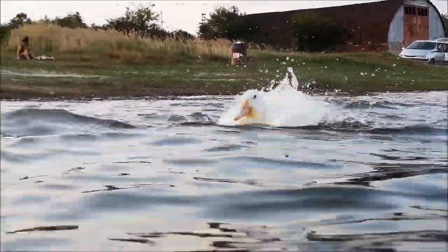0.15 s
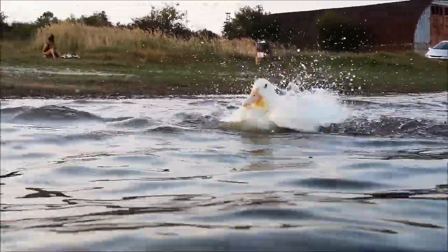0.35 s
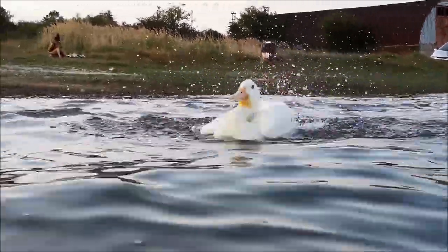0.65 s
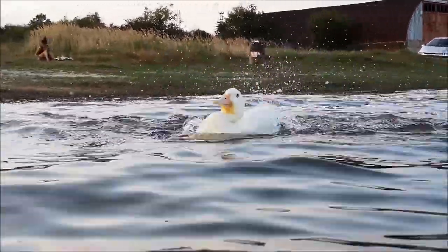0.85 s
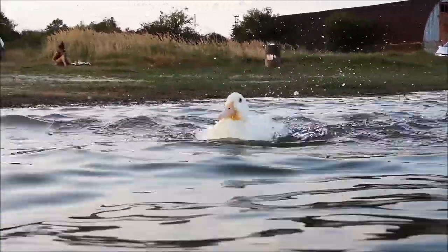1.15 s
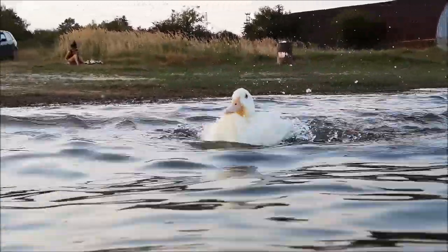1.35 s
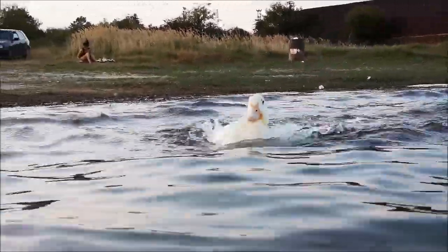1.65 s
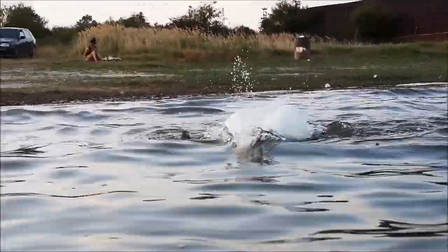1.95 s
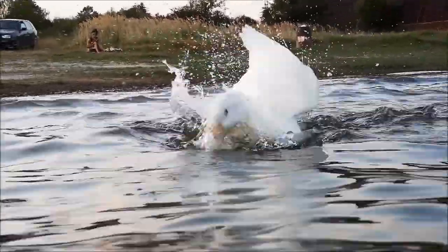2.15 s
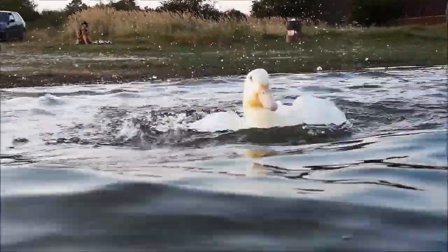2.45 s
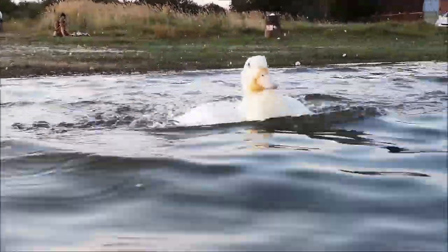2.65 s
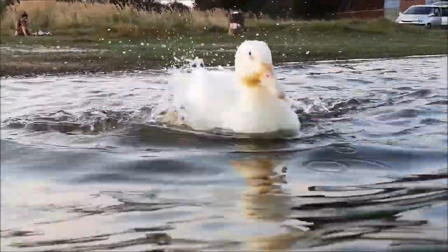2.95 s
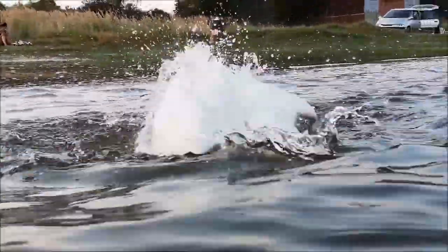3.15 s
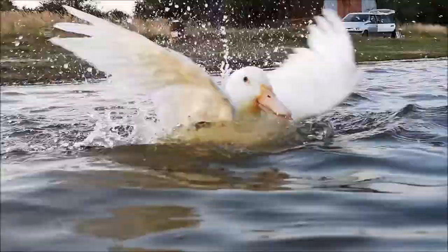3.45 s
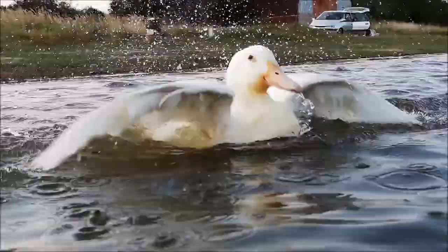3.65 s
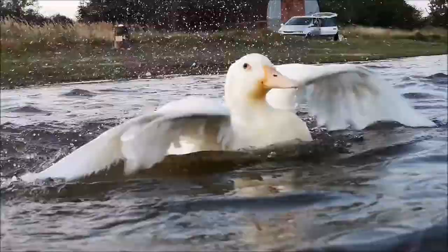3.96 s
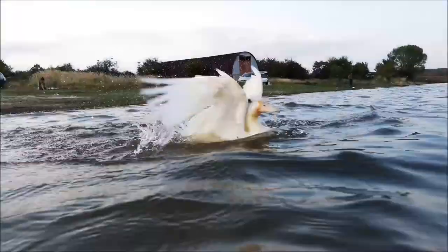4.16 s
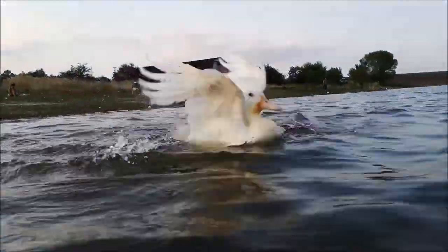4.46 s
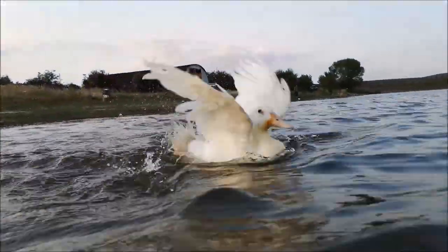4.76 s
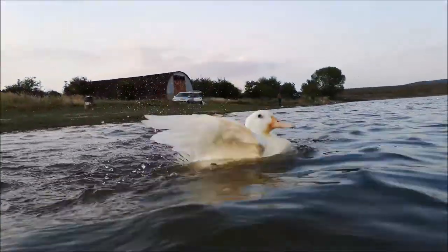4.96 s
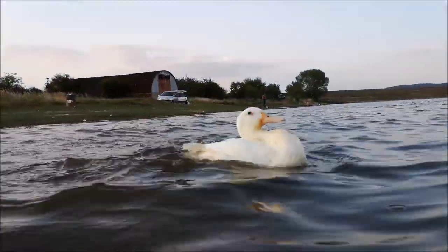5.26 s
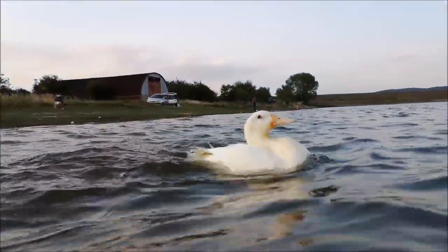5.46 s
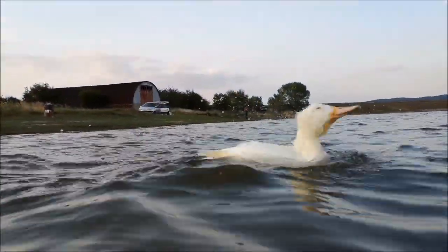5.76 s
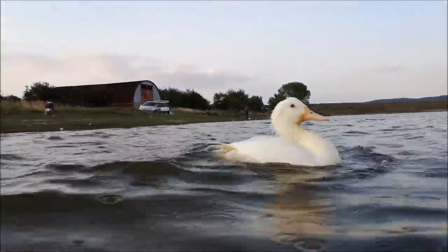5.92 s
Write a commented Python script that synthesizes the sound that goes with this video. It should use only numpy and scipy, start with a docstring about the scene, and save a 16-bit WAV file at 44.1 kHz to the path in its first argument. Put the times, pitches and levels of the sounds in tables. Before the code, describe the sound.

Low gusts thump and flutter on a small microphone throughout, over a faint lake hiss. Ragged splashes with fizzing spray and bubbles come first, then a lull with water running off feathers, a second flurry, and a heavy run of wet wing slaps. After that only tiny drips and soft trickling remain in the wind.

```python
"""A duck thrashes on a windy lake near a small two-port microphone. Its slaps, with small ticks and swells of
splashing, are bursts of noise with ragged tails; churned water is noise mixed with thousands of random droplets.
Low knocks, ringing bubbles and tiny high drop ticks are damped sines that glide up in pitch; water trickles
off the feathers, and a few drips follow once the duck settles. Gusts buffet the ports throughout as low noise,
over a soft hiss from the lake."""
import sys
import numpy as np
from scipy import signal
from scipy.fft import rfft, irfft, next_fast_len
from scipy.io import wavfile
from scipy.ndimage import map_coordinates

SR = 44100
rng = np.random.default_rng(int(sys.argv[2]) if len(sys.argv) > 2 else 0)


def dump_mix(stems):
    """Bounce the given channels to the path in sys.argv[1] as a 16-bit WAV at rate SR."""
    frames = np.atleast_2d(stems).T  # one column per channel
    limited = np.clip(frames, -1, 1)  # hard clip at full scale
    pcm = np.round(limited * 32767).astype(np.int16)
    wavfile.write(sys.argv[1], SR, pcm)


def gain_from_db(level_db):
    """Turn a decibel level (scalar or array-like) into a linear amplitude factor."""
    decades = np.asarray(level_db, float) / 20
    return 10 ** decades


N = 268569  # length in samples

# Gusts on the ports. Each row: time in seconds, rumble level in dB, flutter level in dB.
GUSTS = [(0.0, -24, -41), (0.15, -37, -43), (0.32, -21.5, -34.5), (0.6, -27.5, -50.5), (0.8, -39, -58),
         (0.96, -28.5, -46), (1.17, -21, -30), (1.27, -40, -56), (1.44, -27, -48), (1.76, -46.5, -69),
         (1.83, -27.5, -49), (2.07, -38, -65), (2.17, -21.5, -34), (2.45, -36.5, -46), (2.88, -27, -39),
         (3.02, -35.5, -52.5), (3.14, -31, -38.5), (5.2, -26, -36), (5.33, -34, -45.5),
         (5.55, -21.5, -32.5), (5.74, -33, -44.5), (5.96, -23, -34), (6.09, -34, -49)]
# Churned water, before its brief swells and dips. Each row: time in seconds, body level in dB,
# fine spray level in dB.
CHURN_LEVELS = [(0.0, -42.5, -57), (0.32, -38, -48), (0.6, -43.5, -49), (0.77, -50.5, -54),
                (1.0, -48.5, -59), (1.74, -55, -65), (1.8, -54, -68), (1.9, -44.5, -55), (2.66, -44, -58),
                (3.12, -40, -53.5), (3.5, -42, -51), (3.8, -43, -47), (4.91, -40.5, -45),
                (5.02, -58, -59.5), (5.15, -69.5, -72), (6.09, -68.5, -71)]
# Slaps, small ticks and swells of splashing. Each row: start in seconds, burst level in dB, crack level in dB,
# change of the churn body in dB.
SPLASH_HITS = [(0.0576, -6.5, -13, 4.5), (0.0741, -26.5, -18, 0.5), (0.2192, -15.5, -7.5, 5),
               (0.4331, -12, -10, 2), (0.6057, -18, -12.5, 1.5), (0.9253, -25, -38, 3.5),
               (0.962, -42, -36, 2.5), (1.193, -35.5, -16, -2.5), (1.283, -38.5, -13.5, 2.5),
               (1.319, -42, -24, 6.5), (1.5232, -30, -17.5, -1), (1.648, -35, -25, 5),
               (1.913, -22.5, -48, 0.5), (1.97, -22.5, -14, 0.5), (2.07, -18.5, -18, 3),
               (2.126, -31, -9.5, -3.5), (2.178, -44, -14, -0.5), (2.229, -29, -18.5, 3.5),
               (2.432, -18, -16.5, 8.5), (2.4394, -15.5, -15.5, 0.5), (2.447, -40, -9.5, -7),
               (2.5067, -18.5, -7, 2), (2.597, -23.5, -31, -15), (2.694, -46, -44, 2),
               (2.895, -4.5, -14, 3.5), (3.0238, -18, -9, 4.5), (3.077, -8, -9, 6), (3.201, -17.5, -19, 4),
               (3.2384, -12, -7, 6), (3.3655, 4, 9, 5), (3.5372, -9.5, -1.5, 6), (3.6926, -3.5, -12.5, 8.5),
               (3.854, -14, -5, 6), (3.958, -20, -7.5, 1), (3.9935, -16, 3, 5), (4.1819, -25.5, 0, -2),
               (4.2565, -28, -4, 1), (4.291, -15, -12, 4.5), (4.3235, -20.5, -10.5, -6),
               (4.413, -12, -12.5, 4.5), (4.4293, -3, 6, -1.5), (4.5445, -17.5, -7, 3.5),
               (4.7126, 2.5, 1.5, 3.5), (4.8557, -12.5, 13, -3)]
# Low knocks under some slaps, clear ringing bubbles and tiny high ticks of single drops. Each row: time in
# seconds, level in dB, starting pitch in Hz, t60 in seconds, pitch rise per t60 as a share of the starting pitch.
KNOCKS_AND_BUBBLES = [(0.058, -10, 428, 0.0089, 0.16), (0.218, -3.5, 476, 0.0054, 0.19),
                      (1.84, -38, 550, 0.076, 0.14), (1.915, -18.5, 1090, 0.019, 4),
                      (1.968, -26, 1270, 0.031, 0.18), (2.066, -26, 1194, 0.039, 0.29),
                      (2.108, -25.5, 895, 0.16, 1.87), (2.289, -21, 1260, 0.014, 0.38),
                      (2.93, -25.5, 1610, 0.03, 0.23), (3.025, -24.5, 976, 0.036, 0.21),
                      (3.271, -29.5, 930, 0.09, 0.36), (3.3663, -7, 400, 0.0081, 0.23),
                      (3.592, -25.5, 1170, 0.046, 0.36), (4.095, -15.5, 3370, 0.019, 0.13),
                      (4.195, -34.5, 823, 0.1, 0.65), (4.484, -22, 1068, 0.14, 0.03),
                      (4.485, -20, 1280, 0.034, 0.4), (4.906, -27.5, 1764, 0.058, 0.18),
                      (5.162, -48, 1540, 0.11, 0.09), (5.253, -49.5, 3040, 0.04, 0.1),
                      (5.412, -49, 1950, 0.043, .1), (5.45, -45, 2300, 0.04, 0.23),
                      (5.546, -45, 5500, 0.0086, 0.056), (5.57, -45, 1750, 0.031, 0.18),
                      (5.589, -36.5, 1650, 0.061, 0.64), (5.592, -52, 1154, 0.2, 2.9),
                      (5.659, -38, 7940, 0.008, 0.05), (5.85, -40.5, 1980, 0.039, 0.15),
                      (6.03, -46.5, 1330, 0.034, 0.18)]
# Where the duck is. Each row: time in seconds, lead of the left port in milliseconds.
DUCK_BEARING = [(1.8, 0.016), (2.3, 0.0035), (3.6, 0.11), (4.9, 0.11), (5.5, 0.084)]
# Tone of the splashing as the microphone passes it. Each row: frequency in Hz, level in dB.
SPLASH_TONE = [(330, -11.5), (700, -13.5), (1060, -7.5), (1800, -5), (2750, -4.5), (3600, -7),
               (4500, -12.5), (5900, -8.5), (6600, -15), (9200, -14.5), (11500, -19), (14500, -27.5),
               (16000, -44)]
# Tone of the wind's low rumble. Each row: frequency in Hz, level in dB.
RUMBLE_TONE = [(9, -63), (15, -2.5), (62, -1.5), (110, -5.5), (150, -17.5), (240, -120)]
# Tone of the wind's flutter. Each row: frequency in Hz, level in dB.
FLUTTER_TONE = [(59, -71), (100, -15.5), (146, 1), (355, -27.5), (500, -51), (900, -120)]
# Tone of the far water and shore. Each row: frequency in Hz, level in dB.
LAKE_TONE = [(240, -57.5), (550, -2), (2750, -8), (4000, -45), (11000, -18), (16000, -30)]
# Colour of the two ports. Each row: frequency in Hz, level of left over right in dB.
PORT_TILT = [(700, 0.5), (1800, -1), (2700, -1), (4200, -9.5), (6400, 0), (9500, 5.5), (14000, -11)]
# Likeness of the wind at the two ports. Each row: frequency in Hz, correlation from 0 to 1.
WIND_LIKENESS = [(30, 0.96), (100, 0.95), (350, 0.56)]
# Likeness of the wash at the two ports. Each row: frequency in Hz, correlation from 0 to 1.
WASH_LIKENESS = [(1200, 0.81), (2500, 0.31)]
# Short puffs on the ports. Each row: centre in seconds, half-width in seconds, flutter change in dB,
# rumble change in dB.
PUFF_HITS = [(0.424, 0.021, 14.5, -4), (1.624, 0.029, 5, 11.5), (2.551, 0.019, 13, 13),
             (4.166, 0.075, 7.5, 6), (5.238, 0.024, 6.5, 3.5)]
# Water running off the feathers. Each row: start in seconds, length in seconds, typical drop level in dB,
# typical pitch in Hz.
FEATHER_TRICKLES = [(.8, 0.047, -42.5, 2400), (.92, 0.071, -45, 2080), (1.29, 0.097, -41.5, 2750),
                    (1.53, 0.25, -50.5, 2600), (5.03, 0.46, -61, 3080), (5.69, 0.14, -53.5, 3400)]
# Single pushes of air on both ports. Each row: centre in seconds, level in dB, frequency in Hz.
AIR_PUSHES = [(2.559, -12, 131), (2.637, -11.5, 67), (4.186, -15.5, 140)]


def unit(x):
    """Scales a sound to rms 1."""
    return x / np.sqrt(np.mean(x ** 2) + 1e-20)


def along(points, hz):
    """Reads (Hz, value) points on a log frequency axis."""
    f, v = np.transpose(points)
    return np.interp(np.log(hz + 1), np.log(f + 1), v)


def curves(rows):
    """Gives one value per sample for each column after the time."""
    s, *cols = np.transpose(rows)
    return [np.interp(np.arange(N) / SR, s, c) for c in cols]


def wobble(rate):
    """Draws a smooth random curve with rate knots a second."""
    knots = rng.standard_normal(int(N * rate / SR) + 4)
    return map_coordinates(knots, [np.arange(N) * rate / SR])


def filtered(x, response):
    """Shapes a sound by a response of frequency."""
    m = next_fast_len(N + 8192)
    hz = np.fft.rfftfreq(m, 1 / SR)
    return irfft(rfft(x, m) * response(hz), m)[..., :N]


def above(hz, edge_hz):
    """Gives the gain of a smooth high-pass at an edge."""
    return 1 - 1 / (1 + (hz / edge_hz) ** 6)


def rush(tone, likeness):
    """Makes stereo noise of rms 1 whose sides correlate by the given likeness."""
    def mid_and_side(hz):
        turn = np.arccos(np.clip(along(likeness, hz), -1, 1)) / 2
        return gain_from_db(along(tone, hz)) * [np.cos(turn), np.sin(turn)]

    mid, side = filtered(rng.standard_normal((2, N)), mid_and_side)
    return unit(np.array([mid + side, mid - side]))


def lead(s):
    """Gives the milliseconds by which the left port hears the duck first."""
    return np.interp(s, *np.transpose(DUCK_BEARING))


def plinks(s, gain, hz, t60, rise, lead_ms, size, pop_db=0):
    """Rings damped sines with a soft start and rising pitch, reaching the ports at slightly different times."""
    out, k = np.zeros((2, N + size)), np.arange(size)
    margin = 0.0004  # seconds of room for the port that hears first
    at = np.clip((s - margin) * SR, 0, N - 1).astype(int)[:, None] + k
    for port, side in enumerate((-0.5, 0.5)):
        t = np.maximum(k / SR - (margin + side * lead_ms / 1000)[:, None], 0)
        turns = hz[:, None] * (t + rise * t * t / (2 * t60[:, None]))
        swell = 1 - np.exp(-2 * turns)  # builds up over about half a cycle
        age = t / t60[:, None]
        loss_db = 60 * age + pop_db * np.maximum(age - 0.2, 0)  # a pop dies faster from 0.2 t60 on
        wave = gain[:, None] * swell * gain_from_db(-loss_db) * np.sin(2 * np.pi * turns)
        out[port] = np.bincount(at.ravel(), wave.ravel(), N + size)
    return out[:, :N]


def patter(count, centre_hz, octaves, cycles, spread_db, size, life_octaves=0.46):
    """Rains random droplets around the duck: log-normal pitch and life, some much louder than the rest."""
    u, z = rng.random((count, 2)), rng.standard_normal((count, 3))
    s = u[:, 0] * N / SR
    family = wobble(12)[(u[:, 0] * N).astype(int)]  # drops close in time are alike in size
    hz = np.clip(centre_hz * 2 ** (octaves * (z[:, 0] + 0.5 * family)), 500, 15000)
    t60 = cycles * 2 ** (life_octaves * z[:, 1]) / hz
    gain = gain_from_db(-spread_db * np.log(1 - 0.98 * u[:, 1])) / np.sqrt(t60)
    lead_ms = lead(s) + 0.07 * z[:, 2]
    return plinks(s, gain, hz, t60, 0.12, lead_ms, size)


def wind():
    """Eddies push on the ports in lumps, harder than they pull; crests flutter, and right hears them first."""
    rumble_db, flutter_db = curves(GUSTS) + puffs()
    rumble = unit(gain_from_db(2.36 * wobble(9)) * rush(RUMBLE_TONE, WIND_LIKENESS))
    crest = np.clip(rumble.mean(0), -3, 3)
    flutter = unit(gain_from_db(3.3 * crest + 3.62 * wobble(18)) * rush(FLUTTER_TONE, WIND_LIKENESS))
    edge = gain_from_db(2.5 * (flutter_db + 31)) * filtered(flutter, lambda hz: above(hz, 220))  # hard gusts reach higher
    lopsided = rumble + 0.08 * (rumble ** 2 - 1)
    both = gain_from_db(rumble_db) * lopsided + gain_from_db(flutter_db) * (flutter + edge)
    shift_s = 0.00036 * np.array([[-1], [1]])  # left later, right earlier
    return filtered(both, lambda hz: above(hz, 8) * np.exp(2j * np.pi * hz * shift_s))


def churn():
    """Broken water washes under small bubbles and thin droplet ticks; the level swells and dips in clumps."""
    spray_swing = 2.1  # fine spray swings wider than the body
    level_db, spray_db = curves(CHURN_LEVELS) + churn_swells() * [[1], [spray_swing]]
    clumps_db = 1.5 * wobble(30) + 1.5 * wobble(90)
    wash = rush(SPLASH_TONE, WASH_LIKENESS)
    fizz = patter(count=6500, centre_hz=2301, octaves=0.904, cycles=36, spread_db=4.0, size=500)
    ticks = patter(count=6000, centre_hz=5600, octaves=0.65, cycles=9, spread_db=4.6, size=260, life_octaves=1)

    low = lambda hz: 1 - above(hz, 5820)
    high = lambda hz: above(hz, 4500)
    fizz = unit(filtered(fizz, lambda hz: low(hz) * gain_from_db(along(SPLASH_TONE, hz))))
    body = unit(gain_from_db(-7) * unit(filtered(wash, low)) + fizz)
    mist = gain_from_db(clumps_db) * unit(filtered(wash, high))
    ticks = unit(filtered(ticks, lambda hz: above(hz, 3100) * gain_from_db(along(SPLASH_TONE, hz))))
    drops = gain_from_db(2 * clumps_db + 6) * ticks
    return gain_from_db(level_db + clumps_db) * body + gain_from_db(spray_db) * unit(mist + drops)


def lake():
    """The far water and shore give a soft, steady hiss, nearly unrelated at the two ports."""
    return gain_from_db(-67) * rush(LAKE_TONE, [(1000, 0.1)])


def churn_swells():
    """The churn swells or dips for a moment at each row's time, in dB."""
    rise_s, fall_s = 0.005, 0.067
    t = np.arange(N) / SR
    change_db = np.zeros(N)
    for s, *_, db in SPLASH_HITS:
        age = np.maximum(t - s, 0)
        change_db += db * (1 - np.exp(-age / rise_s)) * np.exp(-(age / fall_s) ** 2)
    return change_db


def splashes():
    """Slaps, small ticks and swells of splashing: a noise burst with a ragged tail, and a thin crack on top."""
    t = np.arange(SR // 5) / SR
    burst, crack = np.zeros((2, 2, N + SR))
    for s, db, crack_db, _ in SPLASH_HITS:
        noise = rng.standard_normal((3, len(t) + 20)).clip(-2, 2)
        shift = round(lead(s) * SR / 1000)  # samples by which right lags
        shared = np.array([noise[0, 10:-10], noise[0, 10 - shift:][:len(t)]])
        onset = 1 - np.exp(-t / 0.0014)
        pair = (shared + 0.95 * noise[1:, :len(t)]) * onset

        # sheets of water tear into drops: the tail jumps in level every 100 samples
        ragged = rng.standard_normal(len(t) // 100 + 1).clip(-3, 1).repeat(100)[:len(t)]
        tail_t60 = min(0.12 * np.exp(-0.27 * (db + 18.5)), 0.15)  # seconds; louder bursts end sooner
        tail = gain_from_db(7.4 * ragged - 60 * t / tail_t60)

        thump = gain_from_db(-60 * t / 0.015)
        snap = gain_from_db(-60 * t / 0.0097)
        here = slice(round(s * SR), round(s * SR) + len(t))
        burst[:, here] += gain_from_db(db) * (thump + 0.5 * tail) * pair
        crack[:, here] += gain_from_db(crack_db) * (snap + 0.028 * tail) * pair
    middle = lambda hz: gain_from_db(along(SPLASH_TONE, hz)) * (1 - above(hz, 6660))
    top = lambda hz: gain_from_db(along(SPLASH_TONE, hz)) * above(hz, 4500)
    return filtered(burst[:, :N], middle) + filtered(crack[:, :N], top)


def knocks_and_bubbles():
    """Low knocks of a few cycles, clear ringing bubbles and tiny high drop ticks: sines that rise, then cut off."""
    s, db, hz, t60, rise = np.transpose(KNOCKS_AND_BUBBLES)
    return plinks(s, gain_from_db(db), hz, t60, rise[:, None], lead(s), size=5000, pop_db=184)  # extra loss per t60


def puffs():
    """Short puffs of air change rumble and flutter along bell-shaped curves, in dB."""
    t = np.arange(N) / SR
    change_db = np.zeros((2, N))
    for s, half_width, flutter_db, rumble_db in PUFF_HITS:
        bell = np.exp(-((t - s) / half_width) ** 2)
        change_db += bell * np.array([[rumble_db], [flutter_db]])
    return change_db


def trickles(count=24):
    """Water running off the feathers rings clusters of small bubbles of like pitch."""
    start, length, db, hz = np.repeat(FEATHER_TRICKLES, count, axis=0).T
    z = rng.standard_normal((len(db), 3))
    s = start + length * rng.random(len(db))
    hz = hz * 2 ** (0.22 * z[:, 0])
    t60 = 45 * 2 ** (0.61 * z[:, 2]) / hz  # typically 45 cycles
    return plinks(s, gain_from_db(db + 3 * z[:, 1]), hz, t60, 0.089, lead(s), size=1500)


def thuds():
    """Each push of air is a brief low pressure swing under a bell-shaped envelope, alike on both ports."""
    t = np.arange(N) / SR
    out = np.zeros(N)
    for s, db, hz in AIR_PUSHES:
        bell = np.exp(-((t - s) * hz / 0.37) ** 2)
        out += gain_from_db(db) * bell * np.cos(2 * np.pi * hz * (t - s) - 0.5)
    return out


def scene():
    """Water sounds pass the differently coloured ports; wind acts on them directly."""
    water = churn() + splashes() + knocks_and_bubbles() + trickles() + lake()
    heard = filtered(water, lambda hz: gain_from_db(along(PORT_TILT, hz) * [[0.5], [-0.5]]))
    return heard + wind() + thuds()


def roll_off(x):
    """The treble ends steeply here."""
    return signal.sosfilt(signal.butter(12, 16480, fs=SR, output="sos"), x)


def record(dry):
    """Delivers the finished mix."""
    return roll_off(dry)


dry = scene()
out = record(dry)
dump_mix(out)
```